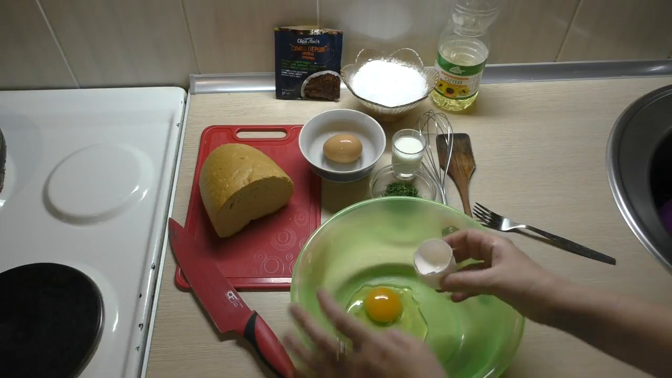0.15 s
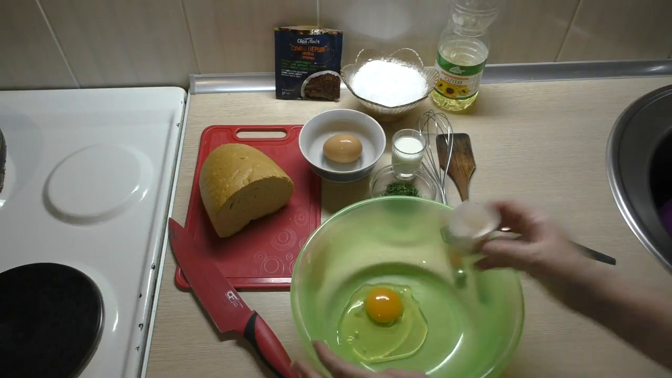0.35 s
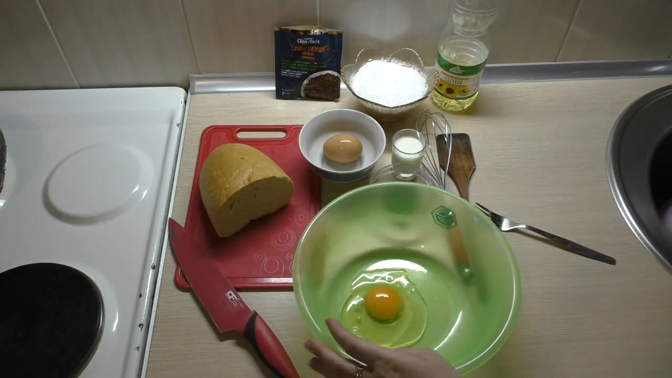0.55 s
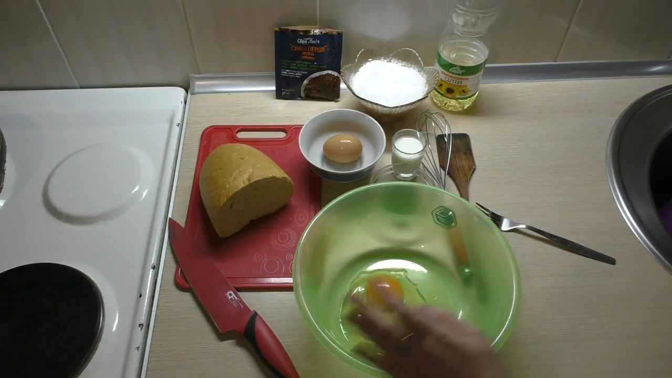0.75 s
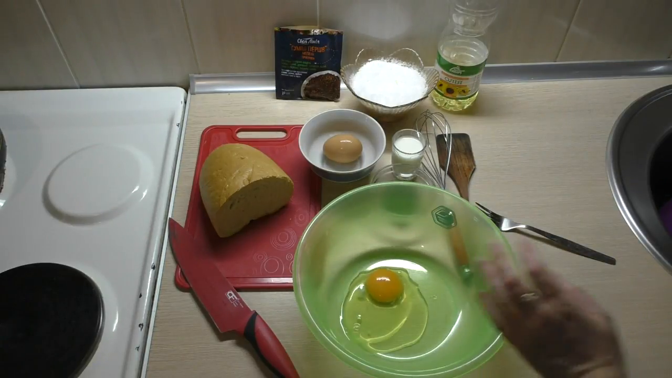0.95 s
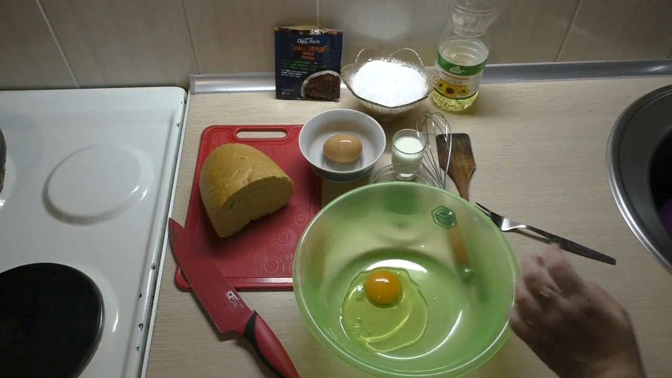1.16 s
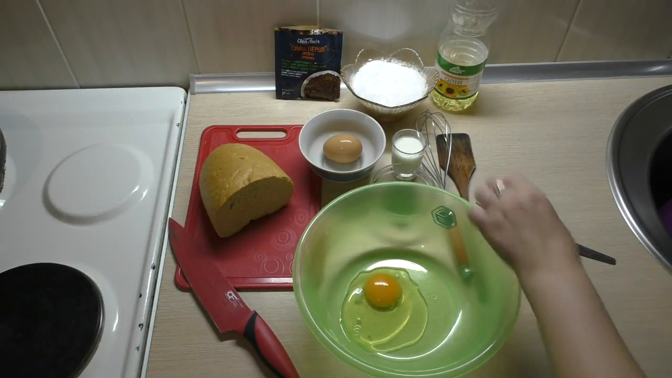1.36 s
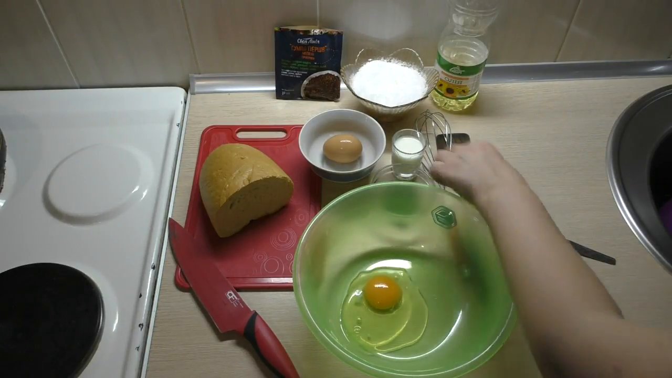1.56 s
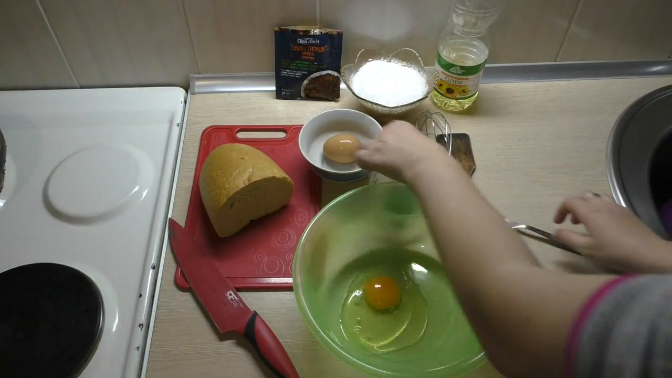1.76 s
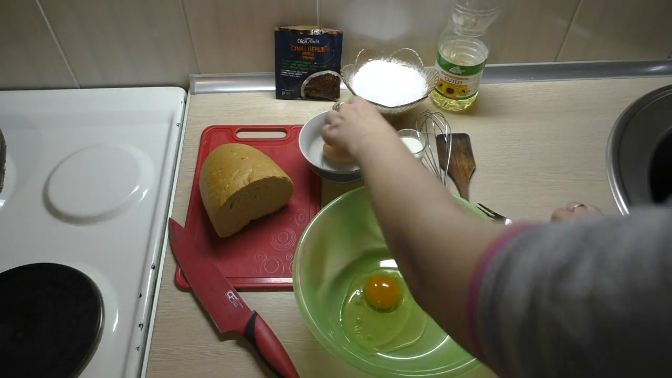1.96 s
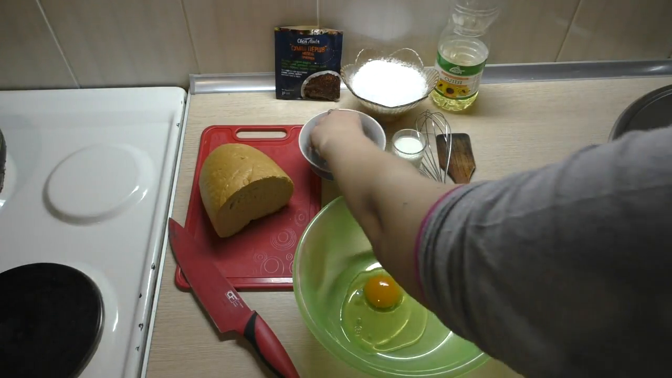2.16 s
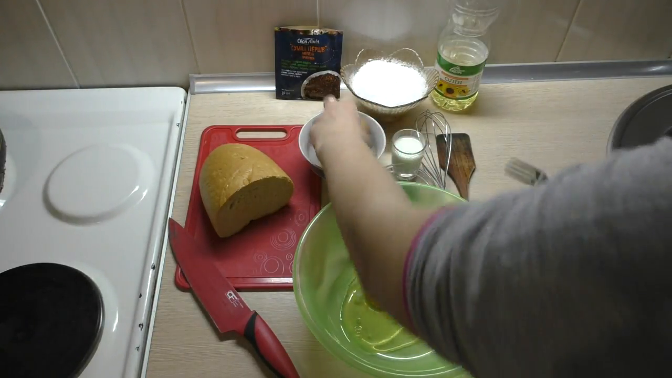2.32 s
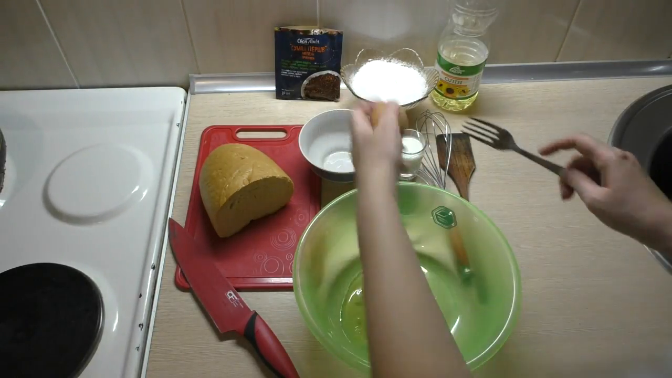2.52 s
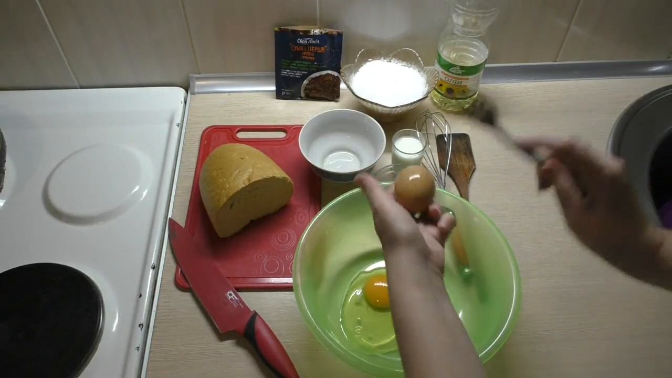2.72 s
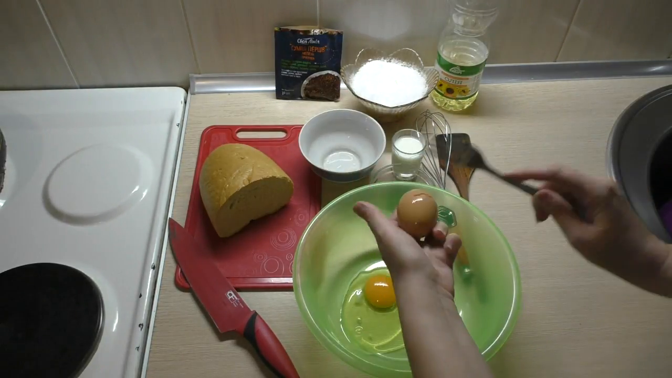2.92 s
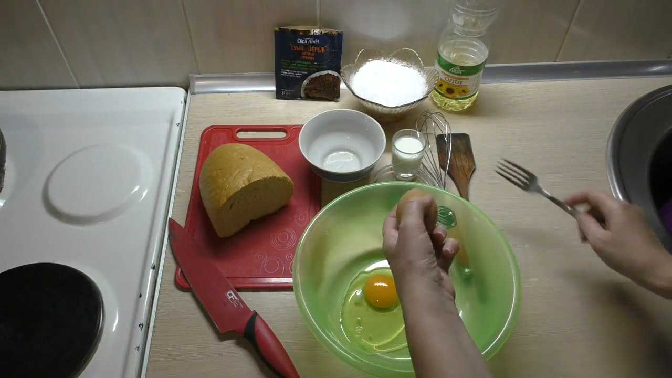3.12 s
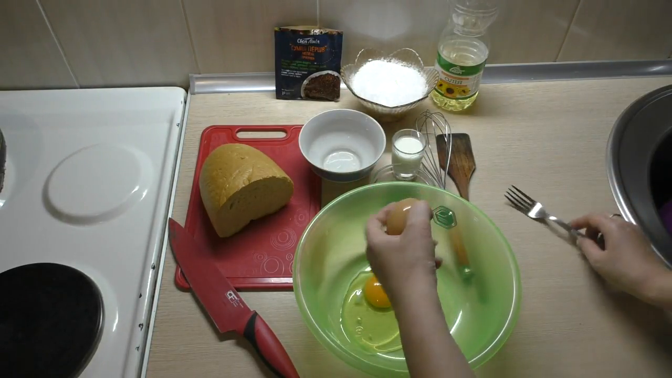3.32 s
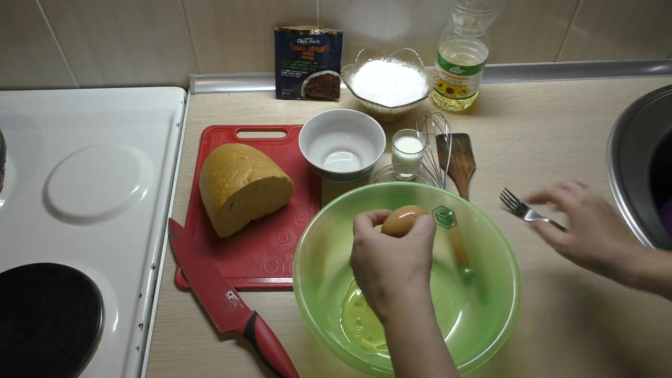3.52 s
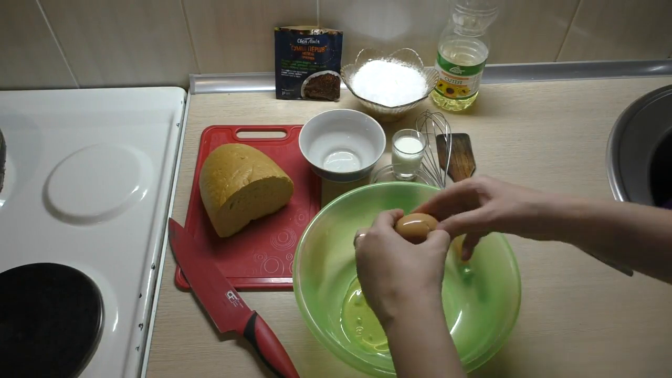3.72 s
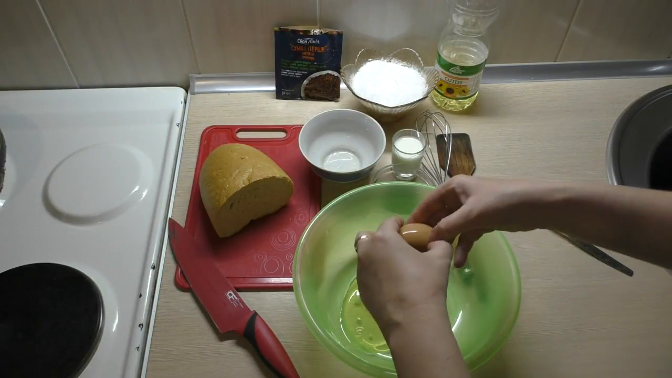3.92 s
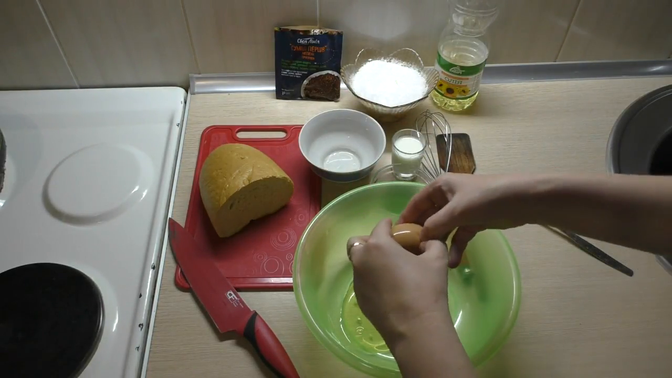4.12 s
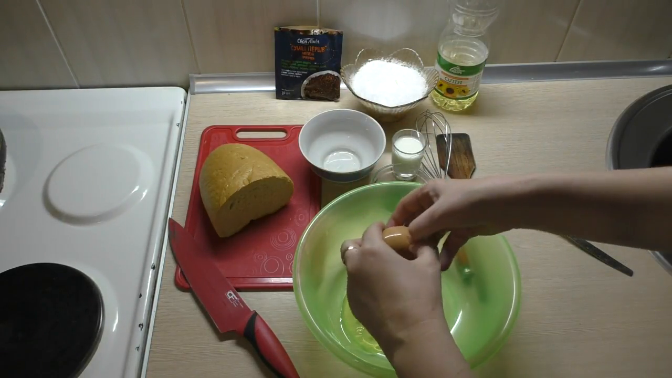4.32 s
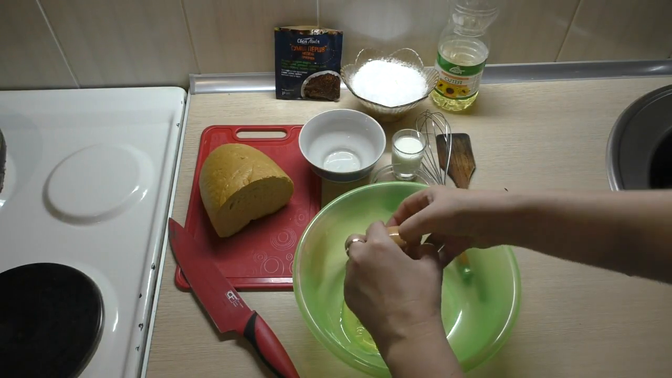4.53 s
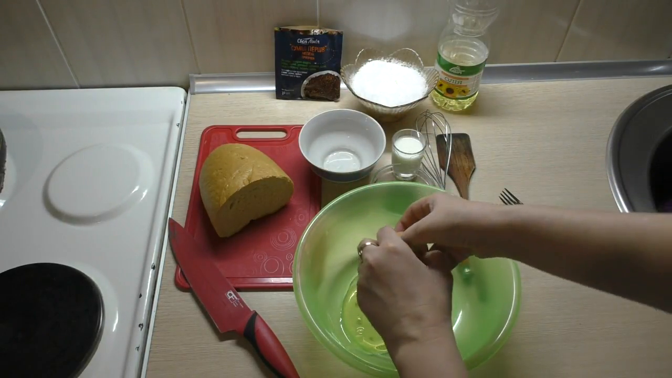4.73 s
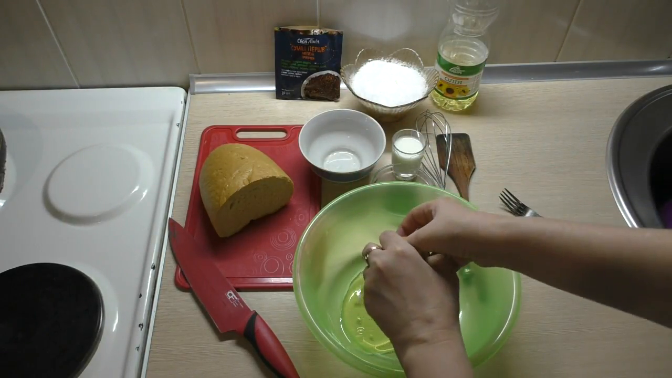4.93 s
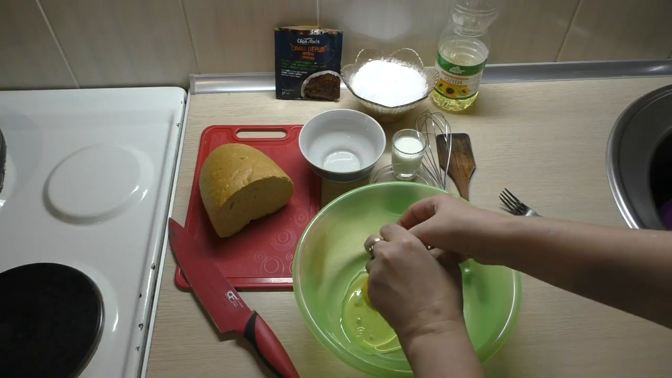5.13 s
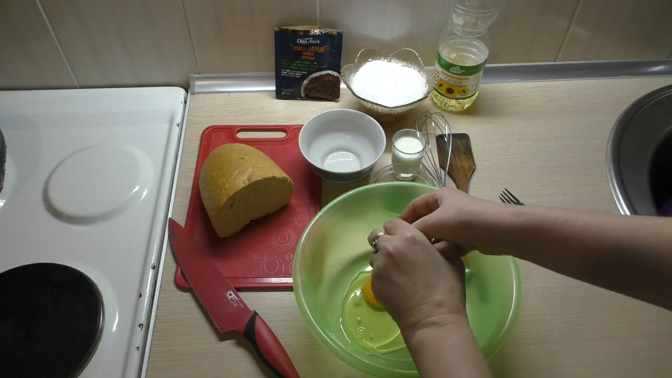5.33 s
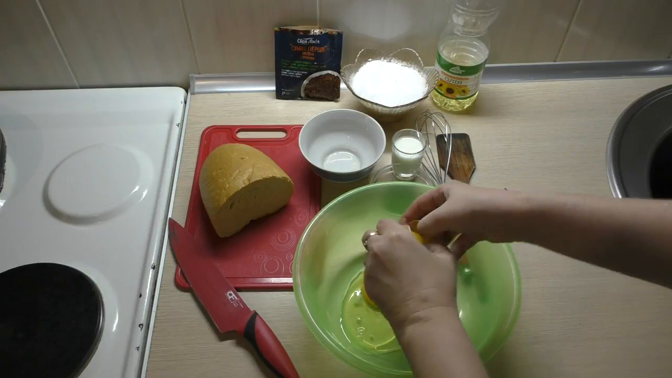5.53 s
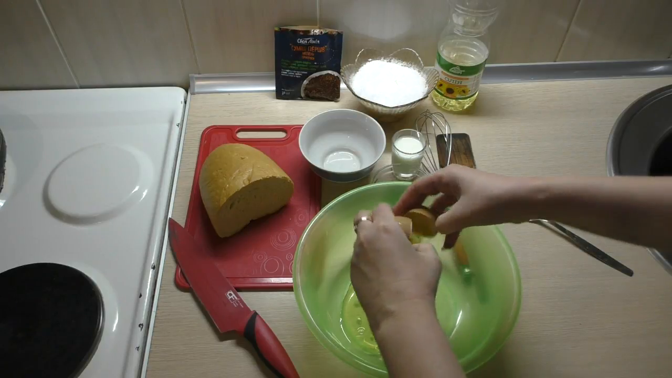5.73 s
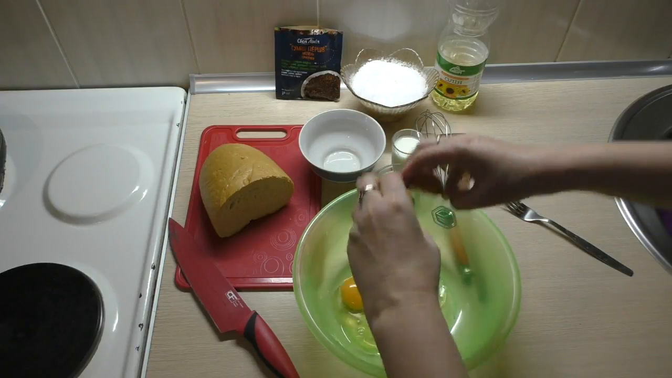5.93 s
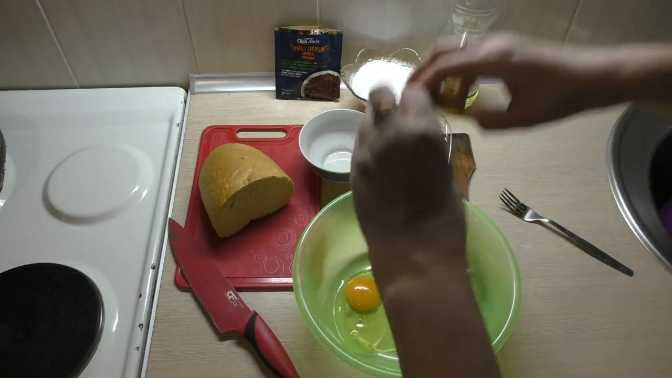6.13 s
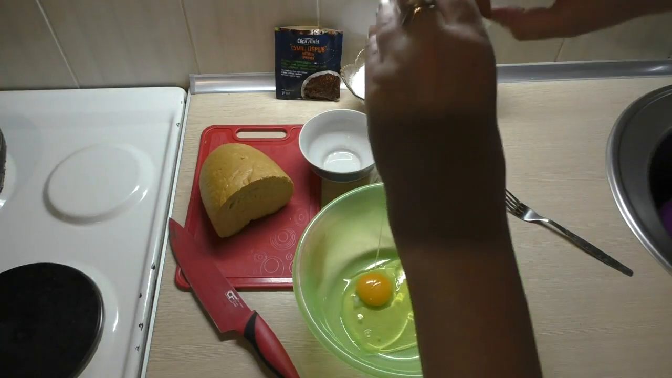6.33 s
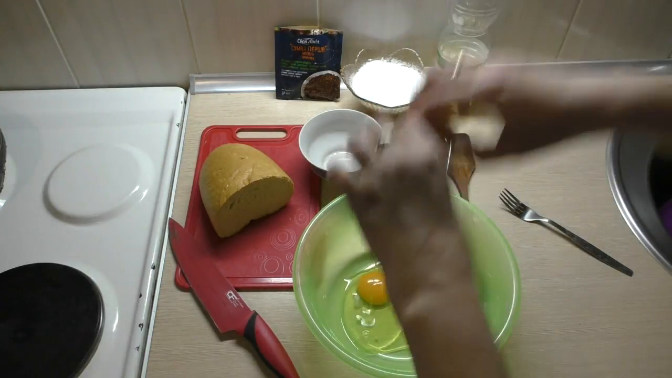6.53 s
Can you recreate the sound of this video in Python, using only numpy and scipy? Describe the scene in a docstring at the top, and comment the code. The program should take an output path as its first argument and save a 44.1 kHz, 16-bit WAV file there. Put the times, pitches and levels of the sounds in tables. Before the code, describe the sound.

Eggshell halves clatter lightly aside, a fork strikes an egg and rattles onto the worktop, then the shell crackles apart.

```python
"""A small tiled kitchen: empty egg shells are tossed aside, a porcelain dish clinks as a fork is picked
up, and the fork strikes an egg. It drops on the worktop and rattles; fingers then crush and pull the
shell apart over a plastic bowl. Each impact or fracture is a short impulse that excites damped
resonances, and rubbing is a dense train of tiny impulses. Two closely spaced microphones hear it all
from above, with reverberation and room tone, through a quick limiter."""
import sys
import numpy as np
from scipy import signal
from scipy.fft import rfft, irfft
from scipy.io import wavfile
from scipy.ndimage import uniform_filter1d

SR = 44100
rng = np.random.default_rng(int(sys.argv[2]) if len(sys.argv) > 2 else 0)


def wrap_up_sound(samples):
    """Save the sound to the file named by the first command line argument, as 16-bit audio."""
    columns = np.atleast_2d(samples).T
    # keep every value between -1 and 1, then stretch to whole-number steps
    tamed = np.clip(columns, -1, 1)
    steps = np.round(tamed * 32767).astype(np.int16)
    wavfile.write(sys.argv[1], SR, steps)


N = 294147

# Spectrum of the fork's blow on the egg: (frequency [Hz], level [dB])
CRACK_SPECTRUM = [(120, -61), (200, -19.5), (268, -22.5), (482, -1), (763, -28), (1230, -2.5), (4430, 0.5),
                  (13100, -13), (16000, -29.5)]
def egg_strike(time_s=2.862, blow_db=8):
    """Impulsive excitation: a brief, hard contact spreads its energy over the whole band."""
    out = np.zeros(N)
    add(out, time_s, at_peak(blow_db, coloured(burst(ms=2.64, rough=.17), CRACK_SPECTRUM)))
    return out


# Spectrum of a hard blow, common to most contacts: (frequency [Hz], level [dB])
BLOW_SPECTRUM = [(88, -87), (150, -57), (205, -28), (466, -1.5), (745, -15), (1120, -3.5), (1480, -0.5),
                 (3420, -2), (4410, -0.5), (11300, -19.5), (16000, -34)]
# Cracks in the shell: (time [s], tick [dB], ring frequency [Hz], ring [dB], treble [dB])
SHELL_SNAPS = [(0.303, -20, 4460, -24, -45), (0.6048, -32, 4560, -36, -43), (0.7378, -38, 4730, -50, -56),
               (1.1514, -36, 2970, -34, -54), (1.378, -28, 4500, -36, -35), (1.46, -41, 2150, -46, -52),
               (1.473, -36, 2480, -31, -39), (4.2055, -51, 3660, -50, -33.5), (4.2512, -35, 5060, -35, -34),
               (4.2916, -24, 1600, -30, -50), (4.431, -38, 4730, -30, -27), (4.666, -37, 4200, -34, -49),
               (4.681, -29, 4100, -34, -46), (4.7054, -41, 4860, -35, -29), (4.9549, -28, 4350, -30, -56),
               (4.961, -45, 3970, -34, -53), (5.0445, -39, 4640, -44, -60), (5.1537, -43, 3850, -34, -45),
               (5.1677, -24.5, 3800, -36.5, -54), (5.1719, -43, 4860, -34, -49),
               (5.486, -46, 4250, -34, -32), (5.4929, -34, 4000, -26.5, -41), (5.5012, -30, 3750, -25, -47),
               (5.5136, -24, 3900, -28, -45), (5.5997, -28.5, 3040, -50, -34),
               (5.6544, -45, 2310, -38, -58), (5.7062, -58, 1930, -33, -60), (5.72, -50, 1880, -27, -59),
               (5.7328, -28.5, 2050, -26, -48), (5.7988, -29, 3320, -24, -19),
               (5.9379, -55, 4160, -44.5, -68), (6.0455, -54, 1470, -33.5, -41),
               (6.506, -36, 2080, -35, -52), (6.559, -34.5, 1810, -41, -52)]
def shell_snaps():
    """Brittle fracture: each crack radiates a bright tick, and the freed piece rings briefly."""
    out = np.zeros(N)
    for s, tick_db, hz, ring_db, treble_db in SHELL_SNAPS:
        crack = burst(ms=2.2)
        add(out, s, at_peak(tick_db, highpass(coloured(crack, BLOW_SPECTRUM), 1780)))
        add(out, s, at_peak(ring_db, resonate_twice(crack, hz, width_hz=880)))
        add(out, s, at_peak(treble_db, highpass(coloured(crack, CRACK_SPECTRUM), 6900)))
    return out


# Modes of the steel: (frequency [Hz], level [dB], 60 dB decay time [s])
FORK_MODES = [(2172, -2, .06), (2850, -6, .04), (3450, -7, .08), (3627, -1, .25), (5034, -4, .18),
              (5795, -8, .1), (6078, -7, .1), (6735, -10, .1), (7951, -6, .25), (8142, -11, .3),
              (10024, -10, .2), (10298, -15, .15), (11413, -19, .2), (12204, -11, .3), (12260, -15, .3),
              (13652, -21, .25), (13921, -23, .25)]
# Contacts with the worktop: (time [s], blow [dB], ring [dB], tine modes re handle modes [dB])
FORK_BOUNCES = [(3.352, 0, -26, -7), (3.357, -12, -25, -30), (3.379, -17, -30, -35),
                (3.452, -10.5, -23, -1), (3.49, -10.5, -38, -12), (3.511, -14, -23.5, 8.5),
                (3.522, 3.5, -30, -9), (3.548, -24, -26, 0), (3.567, -34, -50, -1), (3.594, -15, -40, 1),
                (3.623, -19, -38, 8), (3.68, -17, -41.5, 10), (3.815, -34, -62, -21)]
def fork_bounces():
    """Free vibration: each bounce excites the modes of the steel, and the next contact damps them."""
    out = np.zeros(N)
    handle = ring([mode for mode in FORK_MODES if mode[0] < 7000], seconds=.4)
    tines = ring([mode for mode in FORK_MODES if mode[0] >= 7000], seconds=.4)
    t = np.arange(len(tines)) / SR
    times = np.transpose(FORK_BOUNCES)[0]
    flights = np.append(np.diff(times), 0)
    for (s, blow_db, ring_db, tine_db), flight_s in zip(FORK_BOUNCES, flights):
        blow = burst(ms=4.1, rough=.17)
        knock = .6 * unit_peak(coloured(blow, BLOW_SPECTRUM)) + .62 * unit_peak(worktop(blow))
        add(out, s, gain_of(blow_db) * knock)
        damping = np.exp(-np.maximum(t - flight_s, 0) / .022)
        steel = damping * (handle + gain_of(tine_db) * tines)
        contact = burst(ms=.17, rough=.48) * rng.choice([-1, 1])  # each blow is a brief contact of random polarity
        add(out, s, gain_of(ring_db) * signal.oaconvolve(steel, contact))
    bending_mode = (1058, -37, .75)  # columns as in FORK_MODES
    add(out, times[-2], ring([bending_mode], seconds=1))
    return out


# The fork rocking to rest: (start [s], swell [s], hold [s], fade [s], level [dB])
FORK_ROCKING = [(3.352, .004, 0.26, 0.07, -27.5), (3.624, 0.032, 0.024, 0.088, -22)]
def fork_rattle(flurry_db=-13.5, decay_db_per_s=600, ring_db=-23):
    """Contact chatter: tiny impacts, in a flurry after each bounce, drive the worktop and the steel."""
    out, level = np.zeros(N), np.zeros(SR // 2)
    start = FORK_ROCKING[0][0]
    t = start + np.arange(len(level)) / SR
    for s, *shape, level_db in FORK_ROCKING:
        add(level, s - start, gain_of(level_db) * envelope(*shape))
    for s, blow_db, *_ in FORK_BOUNCES:
        level += (t > s) * gain_of(blow_db + flurry_db - decay_db_per_s * abs(t - s))
    grains = grit(len(level), per_s=4000, spread_db=2)
    clatter = .32 * unit_rms(coloured(grains, BLOW_SPECTRUM)) + .37 * unit_rms(worktop(grains))
    add(out, start, level * clatter)
    steel = ring(FORK_MODES, seconds=.4)
    add(out, start, gain_of(ring_db) * signal.oaconvolve(level * grains, steel / np.linalg.norm(steel)))
    return out


def worktop(force):
    """Forced response: the board answers hard steel with a broad band and little bass."""
    return highpass(resonate_twice(force, 2430, width_hz=2500), 880)


# Modes of a hollow half shell: (frequency [Hz], bandwidth [Hz], level [dB])
SHELL_MODES = [(1190, 150, -11), (1462, 140, 1), (1660, 200, -7), (2200, 500, -7), (2830, 250, -14),
               (4690, 400, -13)]
# Half shells landing: (time [s], blow [dB], ring [dB], mode frequency factor [1])
SHELL_TOSSES = [(0.0024, -25, -26.5, 0.95), (0.0232, -31, -30, 0.97), (1.256, -15, -5, 1.0),
                (1.4736, -30, -37.5, 0.9), (1.4897, -46, -44.5, 0.73), (6.029, -63, -40, 0.88)]
def shell_tosses():
    """Cavity and wall resonance: a half shell lands with a tick and rings as it settles."""
    out = np.zeros(N)
    for s, blow_db, ring_db, tuning in SHELL_TOSSES:
        add(out, s, at_peak(blow_db, highpass(coloured(burst(ms=20.5), BLOW_SPECTRUM), 1000)))
        shake = np.pad(burst(ms=6.7, rough=.22), (0, 3000))
        for hz, width_hz, mode_db in SHELL_MODES:
            add(out, s, at_peak(ring_db + mode_db, resonate_twice(shake, hz * tuning, width_hz)))
    return out


# Knocks on worktop, dish and bowl:
# (time [s], body [dB], body frequency [Hz], thump [dB], thump frequency [Hz])
DULL_KNOCKS = [(0.315, -11.5, 1600, -16.5, 355), (0.337, -33, 1950, -20.5, 510),
               (0.503, -26, 1900, -29.5, 395), (0.54, -29, 1400, -33.5, 405), (1.996, -29, 1860, -46, 476),
               (2.018, -24.5, 2240, -41.5, 490), (2.091, -29.5, 2100, -62, 450),
               (2.104, -41, 2220, -59, 264), (2.197, -32, 1180, -39, 585), (2.218, -25.5, 1100, -29.5, 387),
               (2.244, -30.5, 1140, -40.5, 393), (4.204, -52, 2600, -42.5, 510),
               (4.464, -46, 1990, -39, 474), (4.511, -44, 2360, -42.5, 395), (5.111, -52, 2080, -38.5, 411),
               (5.17, -45, 2700, -41, 446), (5.5, -38, 1680, -41, 520)]
def dull_knocks():
    """Damped resonance: a soft blow drives a lossy body and the low thump of the surface."""
    out = np.zeros(N)
    for s, body_db, body_hz, thump_db, thump_hz in DULL_KNOCKS:
        blow = burst(ms=6.6, rough=.52)
        add(out, s, at_peak(body_db - 24, coloured(blow, BLOW_SPECTRUM)))
        add(out, s, at_peak(body_db, resonate_twice(blow, body_hz, width_hz=600)))
        add(out, s, at_peak(thump_db, resonate_twice(blow, thump_hz, width_hz=193)))
    return out


# Fingers and shells rubbing, sliding and crushing:
# (start [s], swell [s], hold [s], fade [s], level [dB], centre frequency [Hz], relative treble [dB])
SHELL_RUBS = [(0.189, .11, .012, .01, -44, 4220, -11), (0.312, .002, 0.0067, 0.052, -27, 3130, -52),
              (0.399, 0.092, 0.086, 0.14, -43.5, 2600, -39), (0.699, 0.043, 0.022, 0.065, -55.5, 3630, -4),
              (1.06, .1, 0.083, 0.011, -43.5, 4330, -4), (1.262, 0.011, .04, 0.16, -43.5, 1710, -5),
              (1.448, 0.015, 0.024, 0.2, -50, 2010, -15), (1.951, 0.023, 0.011, 0.022, -50.5, 4000, -7),
              (1.992, .004, 0.025, .1, -45, 2350, -31), (2.031, 0.066, 0.016, 0.13, -44.5, 2220, -25),
              (4.187, 0.013, 0.023, 0.12, -54, 3150, -13), (4.259, 0.035, 0.017, 0.17, -45.5, 3420, -27),
              (4.358, 0.078, 0.028, 0.12, -43, 4360, 0), (4.619, 0.049, 0.0098, .1, -44, 4400, -31),
              (4.85, 0.016, 0.011, 0.12, -56, 2600, -15), (4.947, 0.0026, 0.009, .04, -60, 4530, -13),
              (5.101, 0.0079, 0.032, 0.064, -52, 4400, -6), (5.47, 0.024, 0.022, 0.054, -42, 4000, 0.5),
              (5.494, 0.014, 0.015, 0.041, -49, 7050, 8), (5.689, 0.029, 0.015, 0.031, -49, 2110, -28),
              (5.795, 0.0026, 0.0039, 0.027, -54, 3280, 10), (6.022, .015, 0.027, 0.06, -60.5, 1640, -6),
              (6.29, .015, .04, .08, -62, 2200, -19), (6.489, 0.0065, .02, 0.065, -55.5, 2200, -12),
              (6.541, 0.026, .02, .09, -55.5, 2300, 0)]
def shell_rubs():
    """Friction noise: dense, fine clicks pass through a broad resonance set by the grip."""
    out = np.zeros(N)
    for s, *shape, level_db, hz, treble_db in SHELL_RUBS:
        level = gain_of(level_db) * envelope(*shape)
        grains = grit(SR // 2, per_s=9000, spread_db=3)
        scrape = coloured(grains, BLOW_SPECTRUM)
        body = .76 * unit_rms(resonate_twice(grains, hz, width_hz=1980)) + .89 * unit_rms(scrape)
        bright = gain_of(treble_db) * unit_rms(highpass(scrape, 5440))
        add(out, s, level * (body + bright)[:len(level)])
    return out


# Modes of the porcelain: (frequency [Hz], level [dB], 60 dB decay time [s])
DISH_MODES = [(2977, -3, 1.1), (5351, -7.5, 0.35), (8700, -10, 0.16), (10200, 7, 0.013)]
# Light clinks of a small porcelain dish as the fork is picked up: (time [s], tick [dB], ring [dB])
DISH_CLINKS = [(1.956, -33, -62), (1.9764, -41, -66), (2.142, -29, -52), (2.1934, -35, -51)]
def dish_clinks():
    """Lightly damped modes: the porcelain rings on after each small tick."""
    out = np.zeros(N)
    for s, tick_db, ring_db in DISH_CLINKS:
        add(out, s, at_peak(tick_db, highpass(burst(ms=.8), 5000)))
        add(out, s, gain_of(ring_db) * ring(DISH_MODES, seconds=.6))
    return out


# The worktop booming: (start [s], swell [s], hold [s], fade [s], level [dB])
WORKTOP_RUMBLES = [(0.312, .008, 0.036, 0.098, -33), (0.493, 0.014, 0.075, 0.15, -43.5)]
def worktop_rumbles():
    """Sounding-board radiation: sliding shells drive the board's broad, low resonance with noise."""
    out = np.zeros(N)
    for s, *shape, level_db in WORKTOP_RUMBLES:
        level = gain_of(level_db) * envelope(*shape)
        board = unit_rms(resonate_twice(rng.standard_normal(SR // 2), 264, width_hz=216))
        add(out, s, level * board[:len(level)])
    return out


# Reverberation time of the kitchen: (frequency [Hz], 60 dB decay time [s])
ROOM_DECAY = [(250, 0.11), (660, 0.38), (1740, 0.4), (4590, 0.39), (12100, 0.29)]
# Stereo width of the reflections: (frequency [Hz], side re mid [dB])
REVERB_WIDTH = [(60, -18), (110, -21.5), (200, -35), (380, -45), (700, -22), (1290, -28.5), (2380, -21),
                (4400, -11.5), (8120, 0), (15000, 1.5)]
def reverberation(direct):
    """Diffuse reflection: sparse echoes of random sign die away at a separate rate in each band."""
    taps = np.zeros((2, SR))  # mid and side
    arrivals = np.arange(120, SR - 20, 20) + rng.integers(0, 20, (2, (SR - 121) // 20))
    np.put_along_axis(taps, arrivals, rng.choice([-1., 1.], arrivals.shape), 1)
    taps *= 1 + 2.2 * np.exp(-np.arange(SR) / SR / .0053)  # worktop and tiles answer first
    hz, t, bands = signal.stft(taps, SR, nperseg=256)
    bands *= gain_of(-60 * t / curve_at(ROOM_DECAY, hz)[:, None])
    bands[1] *= gain_of(curve_at(REVERB_WIDTH, hz))[:, None]
    tail = signal.istft(bands, SR, nperseg=256)[1]
    tail /= np.linalg.norm(tail[0])
    return stereo(*signal.fftconvolve(direct[None], tail, axes=1)[:, :N])


# Spectrum of the background noise: (frequency [Hz], relative level [dB])
NOISE_SPECTRUM = [(15, -74), (25, -44), (76, -10), (105, -42), (162, -3), (420, 0.5), (455, -11),
                  (805, -12.5), (1110, -7.5), (2320, -13), (2730, -13), (4330, -19.5), (8300, -25),
                  (13900, -27), (16400, -35)]
# Stereo width of that noise: (frequency [Hz], side re mid [dB])
NOISE_WIDTH = [(60, -24), (110, -20), (200, -29), (380, -26.5), (700, -19), (1290, -15.5), (2380, -11),
               (4400, -5.5), (8120, -0.5), (15000, -1)]
def room_tone(noise_db=-53.5, drift_db=.22, whine_db=-79.5, whine_hz=7424):
    """Noise floor: broadband room tone and microphone hiss drift faintly under a narrowband whine."""
    frames, hz = N // 256 + 5, np.fft.rfftfreq(1024, 1 / SR)
    mid_re, mid_im, side_re, side_im, drift = rng.standard_normal((frames, 513, 5)).T
    drift = uniform_filter1d(drift, 12, axis=0)  # smooth over frequency, then over time
    drift = unit_rms(uniform_filter1d(drift, 14, axis=1))
    bands = np.array([mid_re + 1j * mid_im, side_re + 1j * side_im])
    bands[1] *= gain_of(curve_at(NOISE_WIDTH, hz))[:, None]
    bands *= gain_of(curve_at(NOISE_SPECTRUM, hz)[:, None] + drift_db * drift)
    mid, side = signal.istft(bands, nperseg=1024, noverlap=768)[1][:, :N]
    whine = unit_rms(resonate(rng.standard_normal(N), whine_hz, width_hz=8.7))
    return gain_of(noise_db) * stereo(mid, side) / mid.std() + gain_of(whine_db) * whine


def burst(ms, rough=.25):
    """Broadband impulse: a click and its noisy aftermath, whitened, with time constant ms."""
    fade = np.exp(-np.arange(2048) / SR * 1000 / ms)
    click = rough * rng.standard_normal(2048) * fade
    click[0] = 1
    spectrum = rfft(click)
    white = irfft(spectrum / (abs(spectrum) + 1e-9))
    return unit_peak(white * np.sqrt(fade))


def grit(count, per_s, spread_db):
    """Shot noise: clicks at random times, a few of them large."""
    size_draw, sign_draw, time_draw = rng.random((count, 3)).T
    size = gain_of(-spread_db * np.log(np.maximum(size_draw, .01)))
    return unit_rms(size * np.sign(sign_draw - .5) * (time_draw < per_s / SR))


def ring(modes, seconds):
    """Modal superposition: a sum of exponentially decaying sinusoids."""
    t = np.arange(round(seconds * SR)) / SR
    return sum(gain_of(db - 60 * t / t60) * np.sin(2 * np.pi * hz * t) for hz, db, t60 in modes)


def envelope(swell_s, hold_s, fade_s, edge_db=-21):
    """Exponential growth, hold and decay, tapered at both ends."""
    corners = np.cumsum(np.maximum([0, swell_s, hold_s, fade_s], .001))
    t = np.arange(0, corners[-1], 1 / SR)
    return gain_of(np.interp(t, corners, [edge_db, 0, 0, edge_db])) * signal.windows.tukey(len(t), .05)


def resonate(x, hz, width_hz):
    """Resonance by heterodyning: shift hz down to zero, low-pass, and shift back."""
    carrier = np.exp(2j * np.pi * hz * np.arange(1, len(x) + 1) / SR)
    pole = np.exp(-np.pi * width_hz / SR)
    return 2 * (carrier * signal.lfilter([1 - pole], [1, -pole], x / carrier + 1e-18)).real


def resonate_twice(x, hz, width_hz):
    """Cascaded resonators: steeper skirts and a softer onset."""
    return resonate(resonate(x, hz, width_hz), hz, width_hz)


def coloured(x, spectrum):
    """Minimum-phase filter: the phase follows from the log gain by the Hilbert transform."""
    log_gain = np.log(gain_of(curve_at(spectrum, abs(np.fft.fftfreq(4096, 1 / SR)))))
    response = np.exp(np.conj(signal.hilbert(log_gain)))
    return signal.oaconvolve(x, np.fft.ifft(response).real[:2048])[:len(x)]


def highpass(x, hz):
    """Third-order high-pass filter."""
    return signal.sosfilt(signal.butter(3, hz, "high", fs=SR, output="sos"), x)


def curve_at(points, hz):
    """Interpolation on a log-frequency axis."""
    frequencies, values = np.transpose(points)
    return np.interp(np.log(hz + 1), np.log(frequencies + 1), values)


def gain_of(db):
    """Amplitude ratio of a level in dB."""
    return 10 ** (np.asarray(db) / 20)


def unit_rms(x):
    """Normalisation to rms 1."""
    return x / np.sqrt(np.mean(x ** 2) + 1e-20)


def unit_peak(x):
    """Normalisation to peak 1."""
    return x / abs(x).max()


def at_peak(db, x):
    """Normalisation to a peak level in dB."""
    return gain_of(db) * unit_peak(x)


def add(mix, s, sound):
    """Superposition: a sound joins the mix at s seconds."""
    part = mix[round(s * SR):][:len(sound)]
    part += sound[:len(part)]


def stereo(mid, side):
    """Sum and difference give left and right."""
    return np.array([mid + side, mid - side])


def scene(bass_cut_hz=130, reverb_db=-1.5):
    """Linear superposition of direct sound, reverberant field and noise floor."""
    direct = egg_strike() + shell_snaps() + fork_bounces() + fork_rattle() + shell_tosses()
    direct += dull_knocks() + shell_rubs() + dish_clinks() + worktop_rumbles()
    direct = highpass(direct, bass_cut_hz)  # the microphones' low-frequency roll-off
    return direct + gain_of(reverb_db) * reverberation(direct) + room_tone()


def record(dry, threshold_db=-17, ratio=2, cutoff_hz=16300):
    """Dynamic compression: onsets pass, the gain ducks and recovers fast; then clipping and a low-pass."""
    power = signal.lfilter([.012], [1, .012 - 1], (dry ** 2).mean(0))
    power_db = 10 * np.log10(power + 1e-12)
    fall_db = 224 * np.arange(N) / SR  # the held level falls 224 dB a second
    held_db = np.maximum.accumulate(power_db + fall_db) - fall_db
    excess_db = np.maximum(held_db - threshold_db, 0)
    reduction_db = signal.lfilter([.01], [1, .01 - 1], (1 - 1 / ratio) * excess_db)
    clipped = np.clip(dry / gain_of(reduction_db), -.93, .93)
    lowpass = signal.firwin(511, cutoff_hz, window=("kaiser", 9), fs=SR)
    return signal.oaconvolve(clipped, lowpass[None], "same")


dry = scene()
out = record(dry)
wrap_up_sound(out)
```